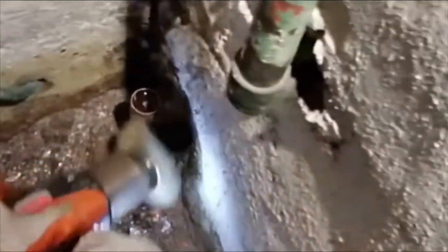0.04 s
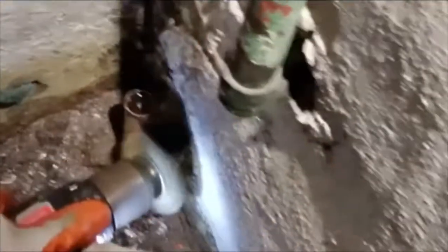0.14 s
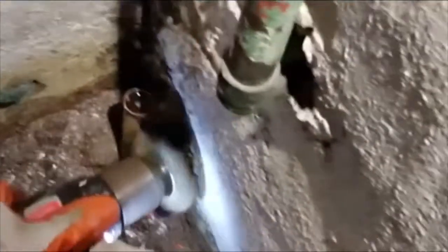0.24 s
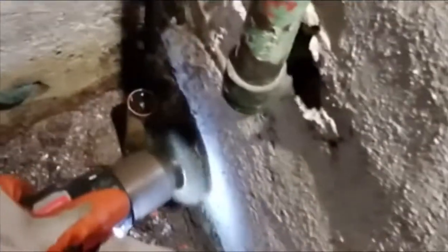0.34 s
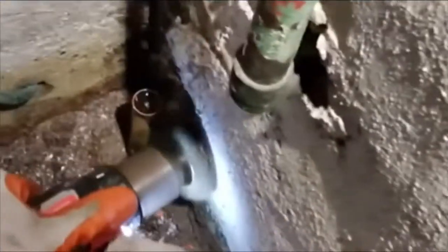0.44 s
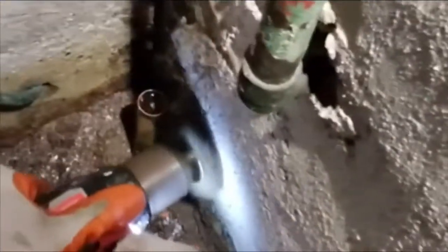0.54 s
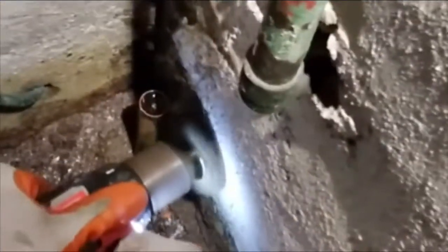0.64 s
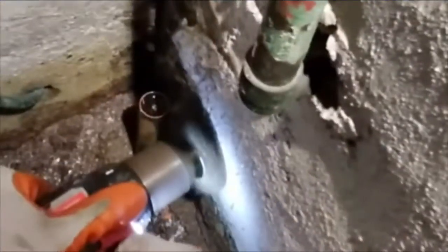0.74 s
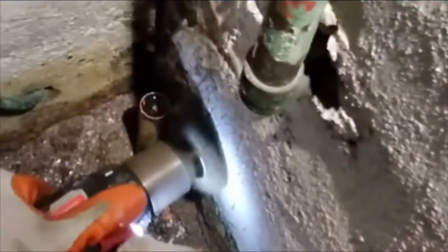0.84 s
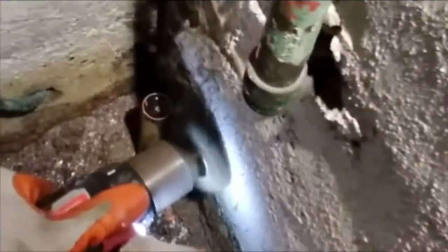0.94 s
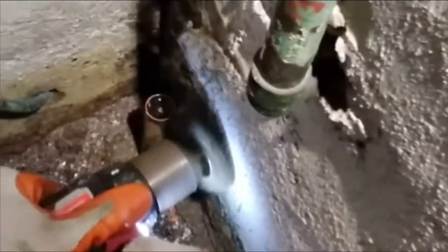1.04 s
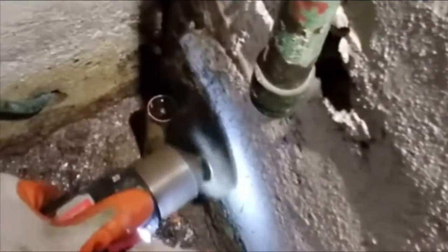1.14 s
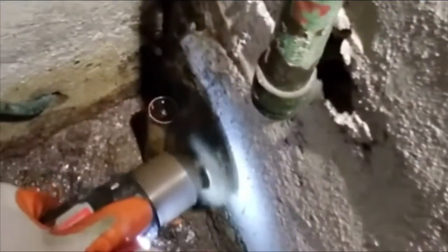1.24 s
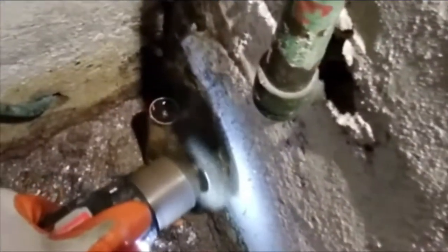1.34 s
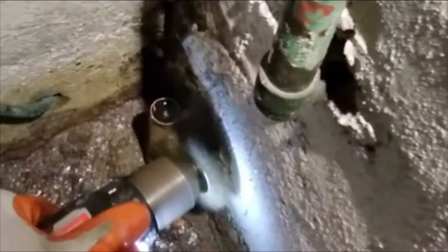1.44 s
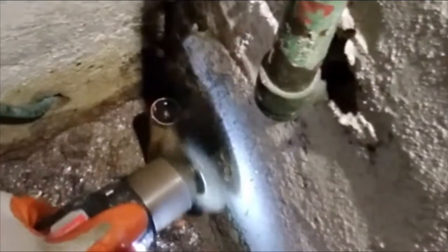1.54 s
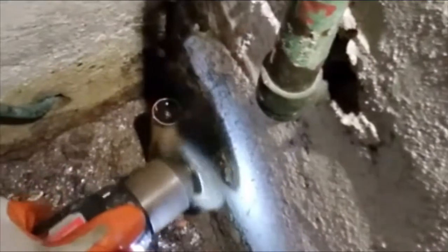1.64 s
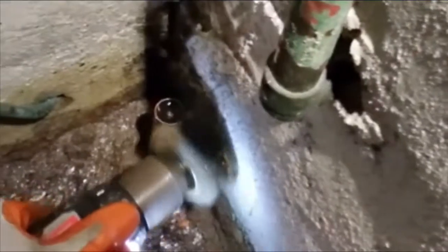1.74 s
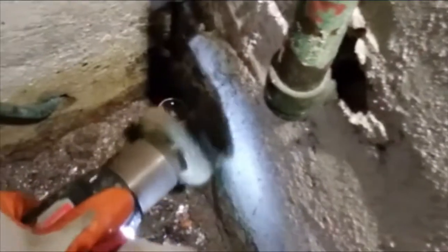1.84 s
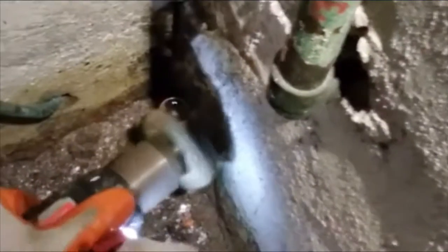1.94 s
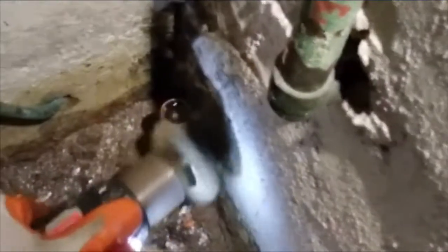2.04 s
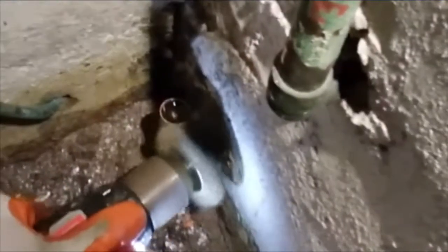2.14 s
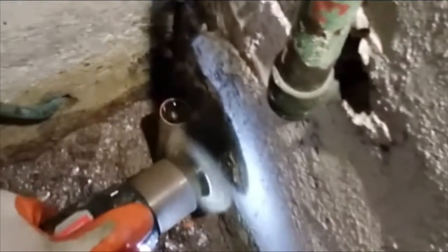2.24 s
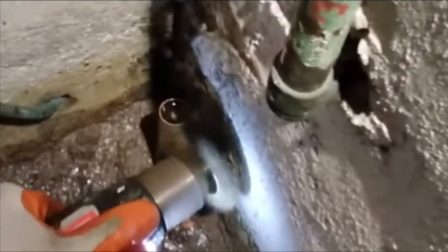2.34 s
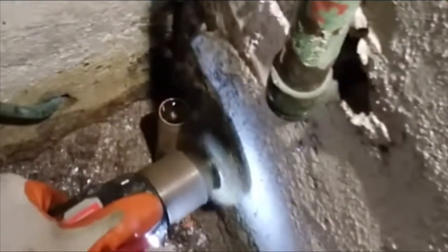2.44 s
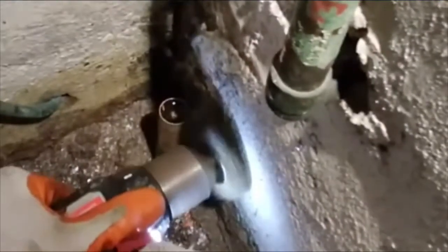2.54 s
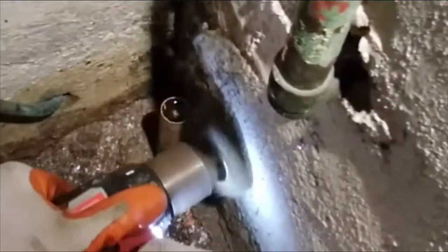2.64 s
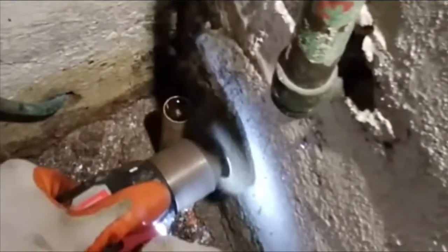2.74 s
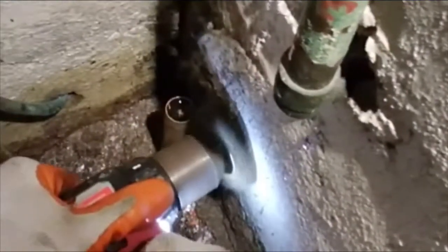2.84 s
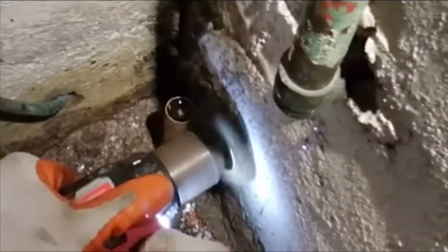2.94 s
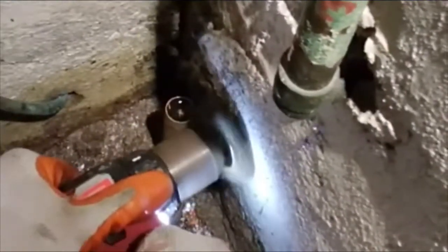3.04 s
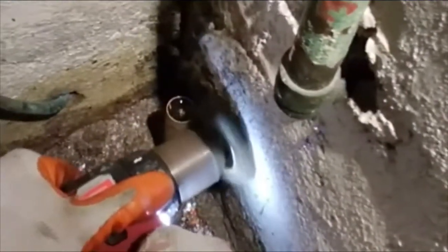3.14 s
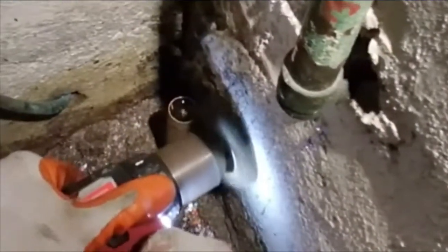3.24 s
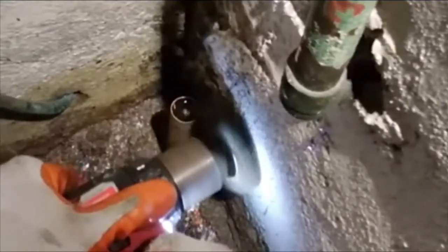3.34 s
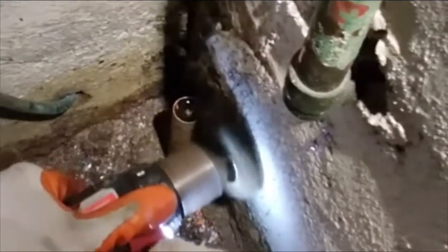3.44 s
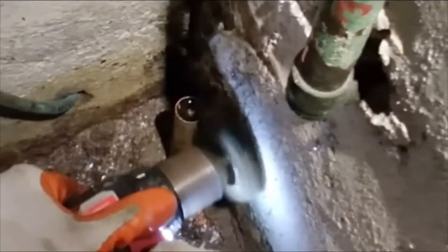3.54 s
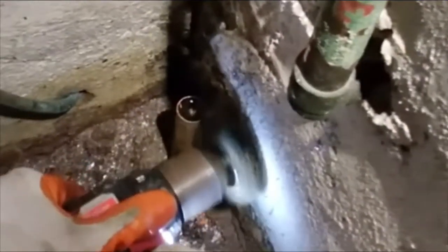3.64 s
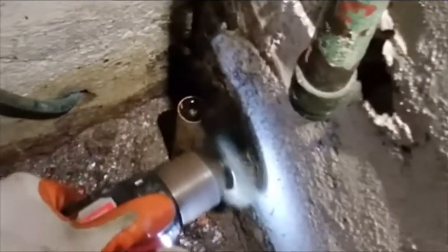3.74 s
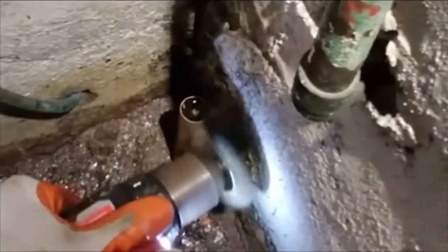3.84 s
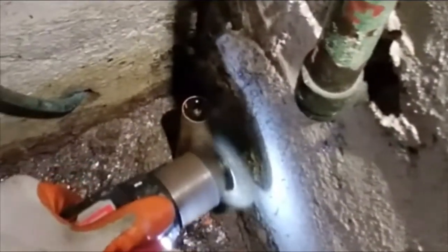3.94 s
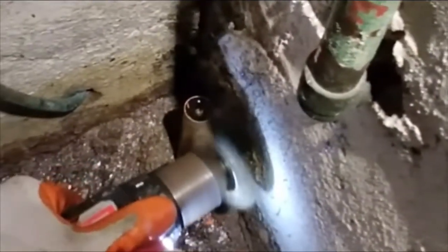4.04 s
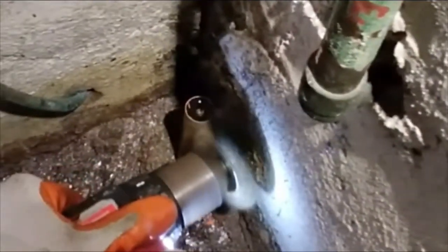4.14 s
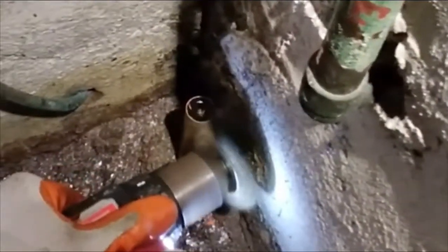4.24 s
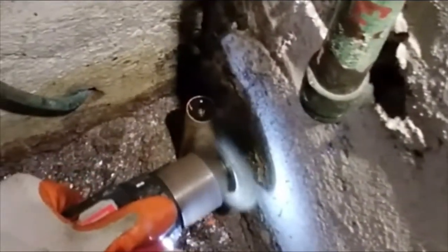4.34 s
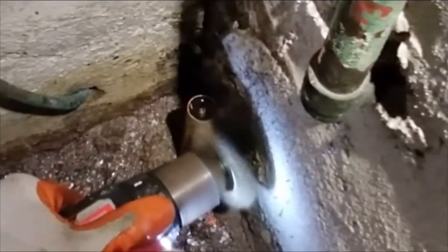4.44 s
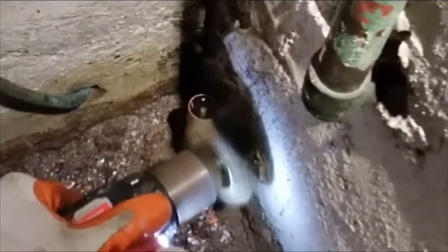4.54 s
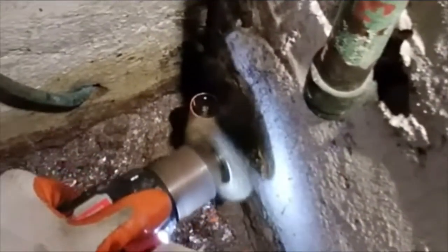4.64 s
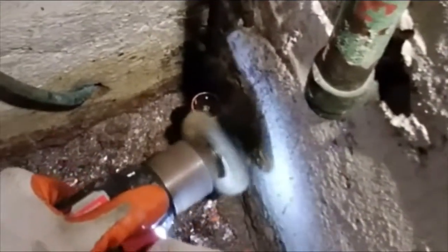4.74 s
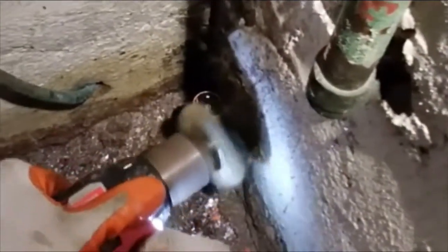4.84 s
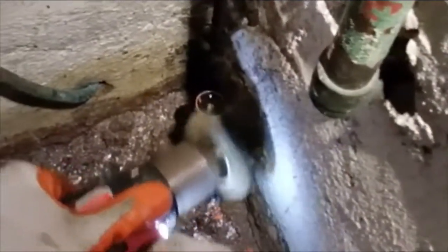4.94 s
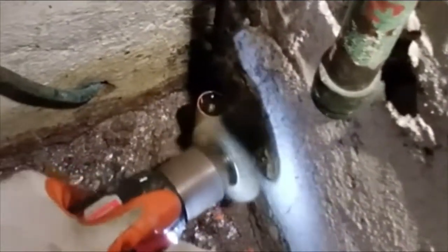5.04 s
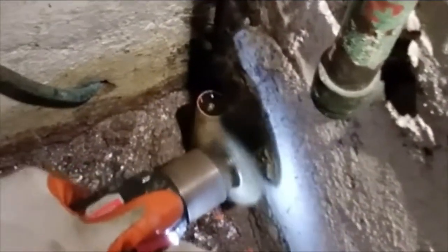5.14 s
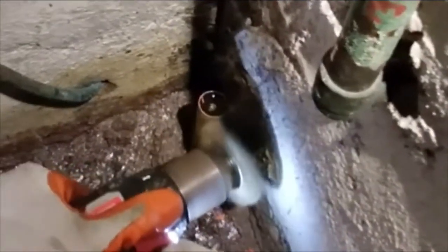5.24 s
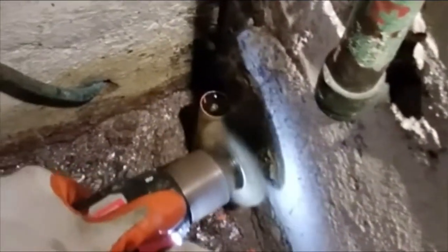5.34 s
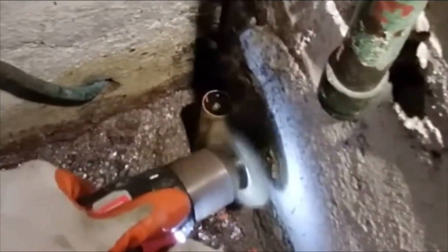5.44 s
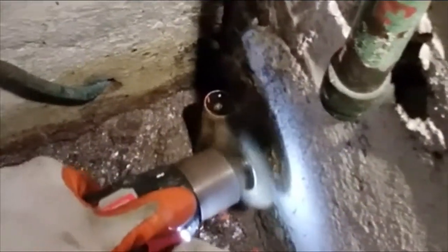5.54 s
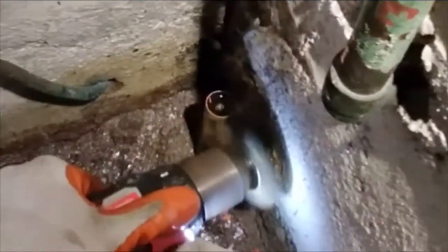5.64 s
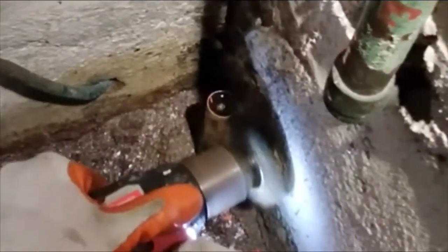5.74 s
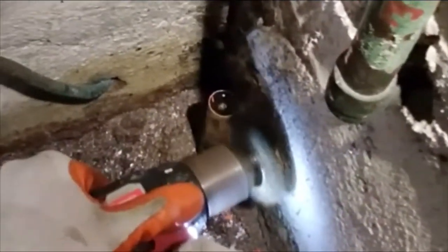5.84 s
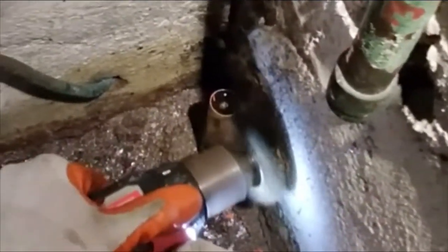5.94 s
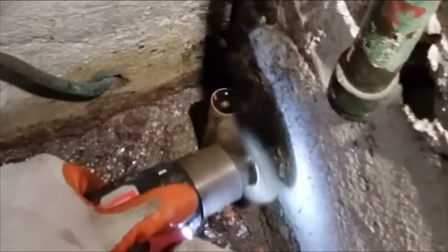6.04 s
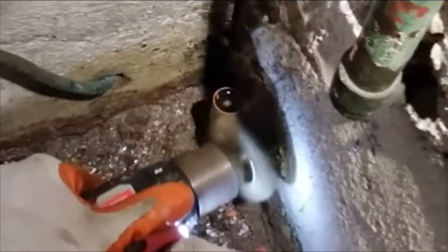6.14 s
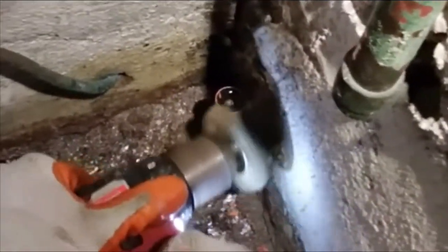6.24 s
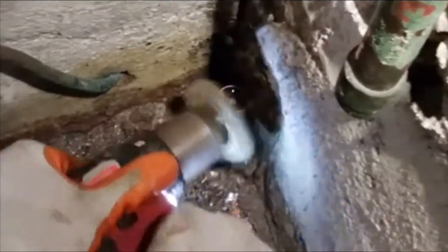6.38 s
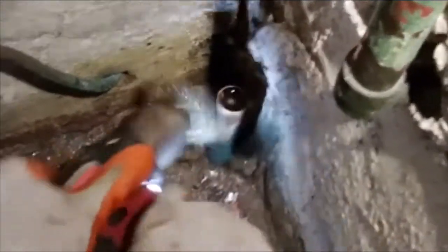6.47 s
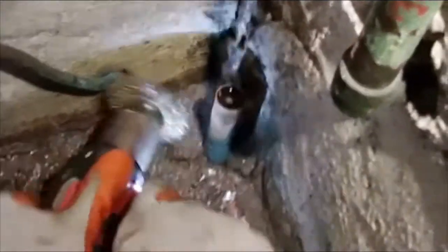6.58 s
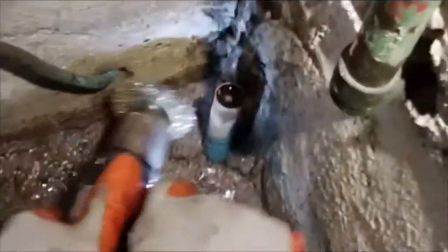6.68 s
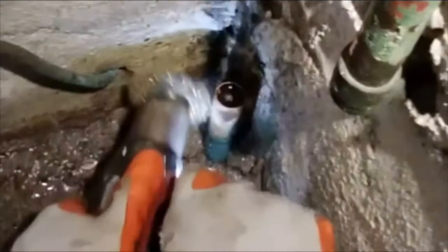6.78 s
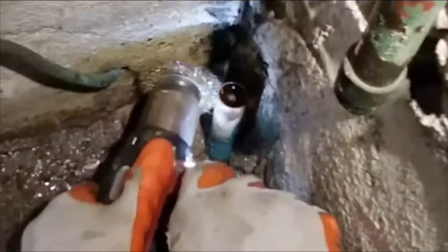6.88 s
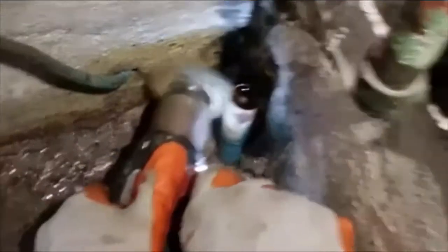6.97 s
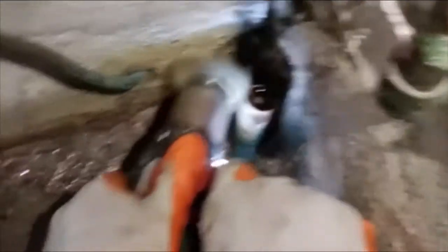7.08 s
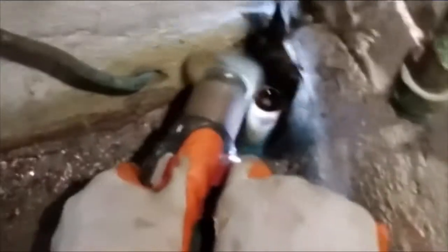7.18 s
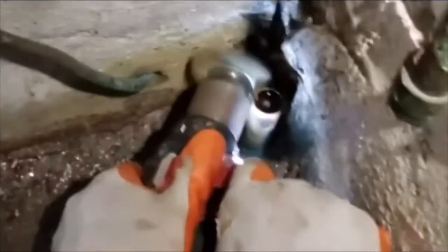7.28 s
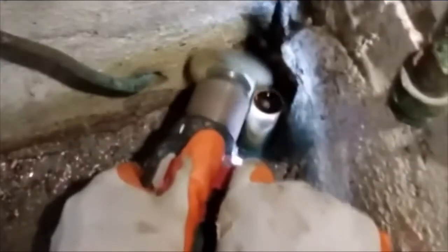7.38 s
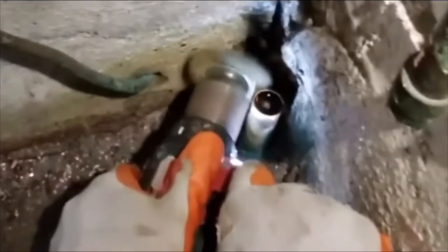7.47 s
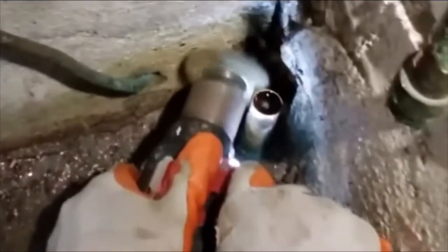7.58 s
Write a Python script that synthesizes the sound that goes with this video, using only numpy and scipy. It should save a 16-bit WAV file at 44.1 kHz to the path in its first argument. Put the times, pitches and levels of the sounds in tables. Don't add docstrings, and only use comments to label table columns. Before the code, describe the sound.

A handheld phone an arm's length away hears a drill-driven wire brush on a pipe: steady gritty motor whine, rapid flutter with each chuck turn, dense metallic scratching and sizzling bristle hiss. The long run swells and eases with pressure, then cuts off sharply. In a half-second gap come faint rustles and one crisp metallic knock, before a slightly lighter second run starts. Quiet low machinery-like hum lies behind.

```python
import sys
import numpy as np
from scipy import signal
from scipy.fft import rfft, irfft, next_fast_len
from scipy.io import wavfile
from scipy.ndimage import uniform_filter1d

SR = 44100
rng = np.random.default_rng(int(sys.argv[2]) if len(sys.argv) > 2 else 0)


def how_loud(loudness_db):
    steps = np.asarray(loudness_db, float) / 20
    return 10 ** steps


def file_out(sig):
    cols = np.atleast_2d(sig).T
    lim = np.clip(cols, -1, 1)
    pcm = np.round(lim * 32767).astype(np.int16)
    wavfile.write(sys.argv[1], SR, pcm)


N = 335601
TIME = np.arange(N) / SR
SIZE = next_fast_len(N)
HZ = np.fft.rfftfreq(SIZE, 1 / SR)
GEAR_RATIO = 14.733

# start_s, brake_s, stop_s, facing_db (whine and bristles turned to the phone)
RUNS = [
    (.021, 6.482, 6.502, 0.1),
    (6.99, 7.7, 7.8, 2.5),
]


def rotor_turns():
    # start_s, slot_hz (three a turn), level_db
    load_curve = [(.22, 980, -44), (.41, 968.8, -40.5), (.8, 940.1, -32.5), (1.2, 934.6, -30.5),
                  (1.77, 934.5, -29.5), (1.86, 946, -39), (2.2, 963.3, -42), (2.85, 932.1, -28.5),
                  (3.19, 888.3, -35.5), (3.8, 919.8, -34), (4.1, 927.5, -28), (4.73, 935.4, -29),
                  (4.8, 941, -36.5), (5.2, 957.4, -39.5), (5.72, 932.3, -31), (6.28, 924.7, -30.5),
                  (6.45, 954.5, -50), (7.2, 933.4, -34.5)]
    spin_up_s, brake_hz_per_s, brake_db = .052, 7000, -32
    loaded_hz, slot_db = read(load_curve)
    share, braking, facing_db = 0, 0, 0
    for start, brake, stop, db in RUNS:
        up = 1 - np.exp(-np.maximum(TIME - start, 0) / spin_up_s)
        slowing = np.maximum(TIME - brake, 0) * brake_hz_per_s / loaded_hz
        share = share + np.maximum(up - slowing, 0) * (TIME > start)
        braking = braking + ((TIME > brake) & (TIME < stop))
        facing_db = facing_db + db * (TIME > start)
    slot_hz = loaded_hz * share
    housing = how_loud(-32) / (1 + ((slot_hz - 630) / 118) ** 2)
    slot = how_loud(slot_db) * share ** 2 + housing + how_loud(brake_db) * braking
    fifth_db = -45.5 + facing_db + 5 / (1 + ((slot_hz * 5 / 3 - 1584) / 3.9) ** 2)
    mesh_db = -49 + 5 * np.clip((TIME - 3.83) / .2, 0, 1)
    return np.cumsum(slot_hz) / SR / 3, slot_hz, (20 * np.log10(slot), mesh_db, fifth_db)


def motor(turns):
    # multiple of rotor speed, level_db, wobble_rad
    orders = [(1.37, -58, 0.085), (4, -60, 0.3), (7, -53, 0.97), (8.2, -51, 0.14), (9, -50, 0.78),
              (12, -51, 0.61), (15.3, -54.5, 2.35)]
    loaded_orders = [(2, -14.5, 0.19), (2.46, -13.5, 0.17)]
    # pitch_hz, width_hz, lower_pitch_hz, lower_width_hz
    case_modes = (6500, 80, 6330, 260)
    rotor, slot_hz, (slot_db, mesh_db, fifth_db) = rotor_turns()
    rotor = 2 * np.pi * rotor
    on = sum((TIME > start + .022) & (TIME < stop) for start, _, stop, _ in RUNS)
    throb = np.cos(2 * np.pi * turns)
    wobble = np.sin(2 * np.pi * turns) + 0.46 * walk(40)

    upper = how_loud(fifth_db + 1.86 * walk(30)) * np.sin(5 * rotor + 0.68 * wobble)
    upper += how_loud(1.063 * fifth_db + 1.0 + 0.76 * walk(4.2)) * np.sin(6 * rotor + .5 * wobble)
    upper += how_loud(-46.5 + 0.55 * walk(6)) * np.sin(rotor + 0.21 * wobble)
    rumble_db = contact()[0]
    for order, db, rad in orders + [(k, rumble_db + db, rad) for k, db, rad in loaded_orders]:
        flutter_db = 2 * (walk(4) + walk(35))
        upper += how_loud(db + flutter_db) * np.sin(order * rotor + rad * (wobble + walk(90)))

    hz, width, low_hz, low_width = case_modes
    case = 1 / (1 + 2j * (HZ - hz) / width) + 0.92 / (1 + 2j * (HZ - low_hz) / low_width)
    mesh = 0.99 * colour(rng.standard_normal(N), case)
    mesh += 1.1 * np.sin(21 * rotor + 1.1 * wobble) / (1 + ((7 * slot_hz - hz) / 150) ** 2)
    upper += how_loud(mesh_db - 5.0 + 1.65 * throb) * mesh
    upper *= np.minimum(slot_hz / 900, 1) ** 2

    slot = how_loud(slot_db + 0.9 * walk(25) + 1.06 * throb) * np.sin(3 * rotor + 0.32 * wobble)
    return np.sqrt(2) * uniform_filter1d(1. * on, size=300) * (slot + upper)


def contact():
    # start_s, rumble_db
    push_curve = [(.2, -53), (.48, -39.5), (.85, -40), (1.45, -37.5), (1.8, -42.5), (1.97, -39.5),
                  (2.2, -45), (2.5, -39), (3.1, -37), (3.7, -36.5), (4.1, -39), (4.9, -41.5), (5.2, -45),
                  (5.9, -35.5), (6.2, -39), (6.45, -49), (7.25, -44.5), (7.5, -41.5)]
    bristle_levels = [
        (-35, 0.29, -57),
        (-38, 0.24, -70),
        (-33.5, 0.27, -61),
    ]
    # centre_s, half_length_s, pipe_db, tips_db
    scrapes = [(0.066, 0.027, -38.5, -55), (0.695, 0.25, -54, -39.5), (1.07, 0.12, -44, -37),
               (1.907, 0.16, -54, -37), (3.024, 0.2, -39, -29), (3.296, .14, -43, -32.5),
               (3.75, .15, -47, -45), (4.75, 0.1, -52, -39), (4.923, 0.066, -52, -35),
               (6.348, 0.025, -44, -32.5), (6.511, 0.019, -38.5, -47), (6.67, .016, -49, -51.5),
               (6.812, .006, -56, -48), (6.83, .012, -60, -52), (6.852, 0.011, -43.5, -58),
               (6.935, 0.018, -62, -58), (7.005, .006, -47, -48), (7.056, .03, -42, -34.5),
               (7.13, .04, -53, -34.5)]
    mean_push_db, rest_rumble_db, engage_s, coast_db_per_s = -40, -60, 0.02, 277
    push_db, = read(push_curve)
    spinning = 0
    for start, brake, _, db in RUNS:
        engaged = np.clip((TIME - start) / engage_s - .5, 0, 1) ** 2
        spinning = spinning + engaged * how_loud(db / 2 - coast_db_per_s * np.maximum(TIME - brake, 0))
    swell = np.array([np.exp(-((TIME - s) / half) ** 2) for s, half, _, _ in scrapes])
    pipe, tips = how_loud(np.array(scrapes)[:, 2:].T) ** 2 @ swell
    power = [(spinning * how_loud(push_db)) ** 2 + pipe + how_loud(rest_rumble_db) ** 2]
    scraped = [pipe * how_loud(-0.5) ** 2, tips, tips * how_loud(0.5) ** 2]
    for (db, slope, rest_db), scrape in zip(bristle_levels, scraped):
        pushed = spinning * how_loud(db + slope * (push_db - mean_push_db))
        power.append(pushed ** 2 + scrape + how_loud(rest_db) ** 2)
    return 10 * np.log10(power)


def repeating(turns, keep):
    steps = 2048
    keep = min(keep, .95)
    fresh = rng.standard_normal((int(turns[-1]) + 2, steps))
    pattern = signal.lfilter([1], [1, -keep], fresh, axis=0).ravel()
    return pattern[(turns * steps).astype(int)] * np.sqrt(1 - keep ** 2)


def ticks(per_s, scatter_db):
    chance = rng.random((2, N))
    size = (chance[0] < per_s / SR) * how_loud(-scatter_db * np.log(1 - chance[1]))
    return np.abs(uniform_filter1d(size, size=24)) ** .5 * rng.standard_normal((2, N))


def brush(turns, throb_db):
    # pitch_hz, width_hz, level_db
    pipe_modes = [(440, 30, -7), (525, 18, 6), (611, 49, -2.5), (682, 21, 9.5), (778, 160, 7.5),
                  (244, 360, -30)]
    # pitch_hz, level_db
    scratch_curve = [(900, -3.5), (1050, -2.5), (1400, 1), (1560, 3), (1700, 1.5), (2250, 5), (2700, -2.5),
                     (3300, -4.5), (6000, -4), (7500, -15.5)]
    # pitch_hz, level_db
    hiss_curve = [(4500, -34), (6500, -14), (7800, -6), (8600, 0), (10500, 0), (11500, -8), (14500, -20)]
    # pitch_hz, level_db
    top_curve = [(6000, -13.5), (9500, -51.5), (11200, -1), (12800, 10), (14500, 2)]
    rumble_db, scratch_db, hiss_db, top_db = contact()
    throb = throb_db * np.cos(2 * np.pi * turns)
    grip = walk(9)
    again = repeating(rotor_turns()[0] / GEAR_RATIO, 0.67)

    wall = sum(how_loud(db) / (1 + 2j * (HZ - hz) / width) for hz, width, db in pipe_modes)
    wall = wall * HZ ** 2 / (HZ ** 2 + 330 ** 2)
    rumble = colour(again, wall) * how_loud(rumble_db + 1.6 * throb + 0.38 * grip)

    strikes = ticks(2500, 1.5) + 0.16 * again
    scratch_db = scratch_db + 0.77 * throb + 0.16 * grip + 0.9 * walk(30)
    scratch = colour(strikes, how_loud(over_hz(scratch_curve))) * how_loud(scratch_db)

    flicker = how_loud(0.97 * throb + 0.48 * grip + .5 * walk(12) + .5 * walk(22.04))
    tips = ticks(16000, .9)
    hiss = colour(tips, how_loud(over_hz(hiss_curve))) * how_loud(hiss_db + .5 * walk(11))
    top = colour(tips, how_loud(over_hz(top_curve))) * how_loud(top_db - 3.5 + .5 * walk(5.84))
    return rumble + scratch + flicker * (hiss + top)


def ring(x, hz, t60):
    pole = np.exp(2j * np.pi * hz / SR - np.log(1000) / (t60 * SR))
    return signal.lfilter([1], [1, -pole], x).imag


def knocks():
    # start_s, peak_db, bright_db (per octave), stretch (of ring)
    knock_events = [
        (0.031, -30, 1, 0.99),
        (6.485, -26.5, -11, 0.93),
        (6.846, -18, 6.5, 0.9),
        (7.012, -23, -20, 0.91),
    ]
    # pitch_hz, level_db, t60_s
    knock_modes = [(706, -27, 0.026), (946, 4, 0.045), (1230, 4, 0.04), (1460, 2, 0.02), (1870, -2, .03),
                   (2438, 1.5, 0.039)]
    # start_s, level_db, pitch_hz, t60_s
    bumps = [
        (0.0001, -25, 255, 0.14),
        (0.092, -28, 190, .08),
        (0.105, -27, 200, 0.069),
        (4.706, -30, 162, 0.12),
    ]
    out = np.zeros(N)
    age = TIME[:int(.2 * SR)]
    for s, db, bright_db, stretch in knock_events:
        crunch = rng.standard_normal(len(age)) * age * np.exp(-age / (.0012 * stretch))
        crunch /= np.abs(crunch).max()
        body = 0
        for hz, mode_db, t60 in knock_modes:
            level = how_loud(mode_db + bright_db * np.log2(hz / 1500))
            body = body + level * ring(crunch, hz, t60 * stretch)
        hit = body / np.abs(body).max() + how_loud(-12.0 + bright_db) * crunch
        out[int(s * SR):int(s * SR) + len(age)] += how_loud(db) * hit
    for s, db, hz, t60 in bumps:
        since = np.maximum(TIME - s, 0)
        out += how_loud(db - 60 * since / t60) * np.sin(2 * np.pi * hz * since)
    return out


def hum():
    # pitch_hz, level_db (per Hz)
    hum_curve = [(30, -40), (60, -0.5), (100, 8.5), (125, 1.5), (250, -3), (450, -4), (930, -8.5),
                 (2020, -10), (2700, -21), (3800, -19.5), (6000, -52), (9000, -22), (14500, -31)]
    return colour(rng.standard_normal((2, N)), how_loud(over_hz(hum_curve))) * how_loud(-45 + 0.91 * walk(5.175))


def port_hiss():
    low_hz, high_hz = 2600, 5000
    air = rng.standard_normal(N) + .5 * rng.standard_normal((2, N))
    return how_loud(-61) * colour(air, 1 / (1 + (low_hz / (HZ + 1)) ** 12) / (1 + (HZ / high_hz) ** 2))


def read(table):
    s, *columns = np.transpose(table)
    return [np.interp(TIME, s, c) for c in columns]


def over_hz(points, column=1):
    p = np.array(points)
    return np.interp(np.log(HZ + 1), np.log(p[:, 0]), p[:, column])


def colour(x, gain):
    y = irfft(rfft(x, SIZE) * gain, SIZE)[..., :N]
    return y / np.sqrt(np.mean(y ** 2))


def walk(rate):
    k = int(SR / rate)
    held = np.repeat(rng.standard_normal(N // k + 1), k)
    return 1.26 * uniform_filter1d(uniform_filter1d(held, k), k)[:N]


def ports(pair):
    # pitch_hz, level_db
    left_curve = [(2300, 0), (2900, 5), (3350, 1), (3800, 4.5), (4100, 2.5), (4800, -6), (5450, -34),
                  (5750, -6.5), (6500, 4.5), (6900, 11), (8200, 5.5), (8600, 5.5), (12900, 9), (14200, 8.5)]
    # pitch_hz, level_db
    right_curve = [(2300, 0), (2850, 2.5), (3400, 4), (3800, 0.5), (4200, 8.5), (4750, 2), (5400, 3.5),
                   (6000, 6), (6500, 5), (6900, 4.5), (8000, 4), (9500, 0), (12000, -7.5), (13800, 0.5)]
    # pitch_hz, likeness (0-1), lead_cycles
    likeness = [(2427, 1, 0), (2650, 0.13, -0.36), (3110, 0.55, -0.23), (3900, 0.74, -0.54),
                (4270, 0.77, -0.57), (4720, 0.72, -0.79), (5360, 0.2, -1.36), (6430, 0.65, -0.9),
                (7260, 0.4, 0.0086), (7700, 0.3, -0.93), (12100, 0, -0.65), (13500, 0.6, -0.37)]
    echo_s, echo_share = .000788, 0.85
    first, second = rfft(pair, SIZE)
    like = np.clip(over_hz(likeness), 0, 1)
    lead = np.exp(2j * np.pi * over_hz(likeness, column=2))
    right = like * lead * first + np.sqrt(1 - like ** 2) * second
    reach = np.interp(HZ, [8500, 11000, 12900, 13500], [0, 1, 1, 0])
    echo = 1 - echo_share * reach * np.exp(-2j * np.pi * HZ * echo_s)
    heard = [first * how_loud(over_hz(left_curve)), right * echo * how_loud(over_hz(right_curve))]
    return irfft(np.array(heard), SIZE)[:, :N]


def dropouts(x):
    # left_share, right_share, low_hz, high_hz, time_share
    weak_bands = [(1, 0, 5300, 5640, .6), (1, 0, 4950, 5300, .3), (.5, .5, 3200, 3400, .12),
                  (.5, .5, 3400, 3650, .2), (.5, .5, 3860, 4030, .5), (.5, .5, 4030, 4200, .55),
                  (.5, .5, 4300, 4550, .12), (0, 1, 11280, 11620, .25), (0, 1, 12480, 12780, .2)]
    hz, _, frames = signal.stft(x, SR, window="cosine", nperseg=2048)
    power = np.sum(np.abs(frames[0]) ** 2, axis=0)
    loud = power > np.median(power) / 10
    for left, right, low_hz, high_hz, share in weak_bands:
        band = (hz > low_hz) & (hz < high_hz)
        gone = loud & np.repeat(rng.random(len(loud)) < share, 2)[:len(loud)]
        part = (left * frames[0, band] + right * frames[1, band]) * gone
        frames[0, band] -= (left > 0) * part
        frames[1, band] -= (right > 0) * part
    return signal.istft(frames, SR, window="cosine", nperseg=2048)[1][:, :N]


def scene():
    # start_s, angle_turns (round the brush), throb_db
    rim_touch = [(.37, -.6, 1.5), (.62, -.37, 1.7), (1.35, -.34, 1.6), (1.75, -.67, 1.3), (2.15, -.66, 1.5),
                 (2.7, -.2, 1.5), (3.15, -.22, .3), (3.65, -.06, 1.6), (4.1, -.29, 1.4), (4.75, -.38, 1.5),
                 (5.3, -.24, .8), (5.85, .2, 1.6), (6.2, -.11, 1.3), (7.2, -.05, .9), (7.6, -.3, 1.2)]
    rim, throb_db = read(rim_touch)
    chuck = rotor_turns()[0] / GEAR_RATIO
    turns = chuck - chuck[SR // 4] + rim
    return ports(motor(turns) + brush(turns, throb_db) + knocks() + hum()) + port_hiss()


def band_limit(x):
    return signal.sosfilt(signal.butter(12, 14910, fs=SR, output="sos"), x)


def record(dry):
    band = signal.sosfilt(signal.butter(3, 55, "high", fs=SR, output="sos"), dry)
    band = signal.sosfilt(signal.ellip(10, .3, 60, 14280, fs=SR, output="sos"), band)
    return band_limit(dropouts(band))


dry = scene()
out = record(dry)
file_out(out)
```